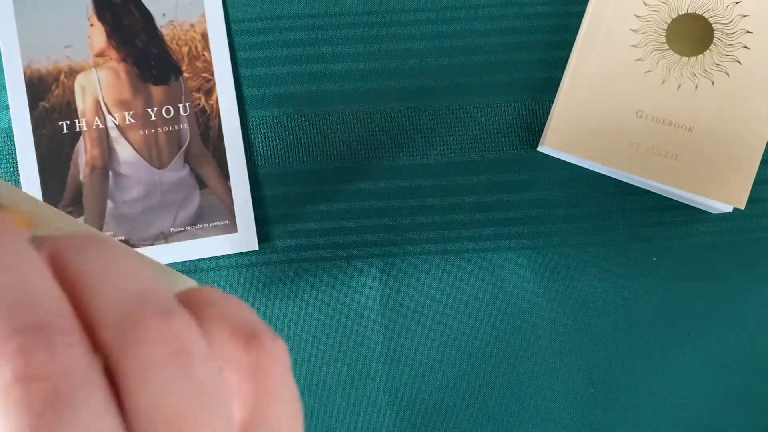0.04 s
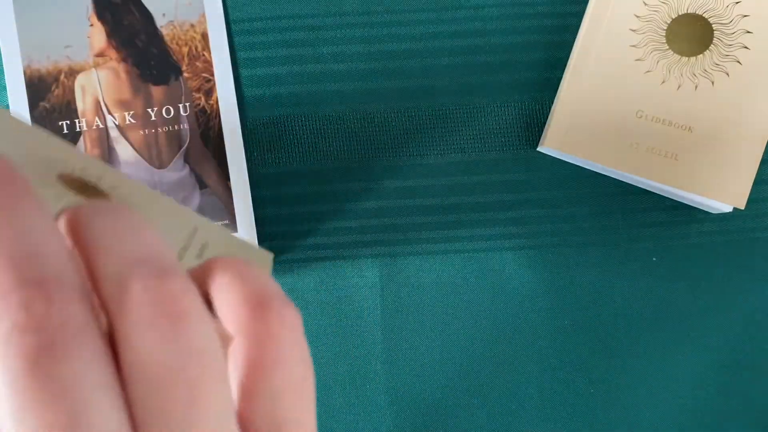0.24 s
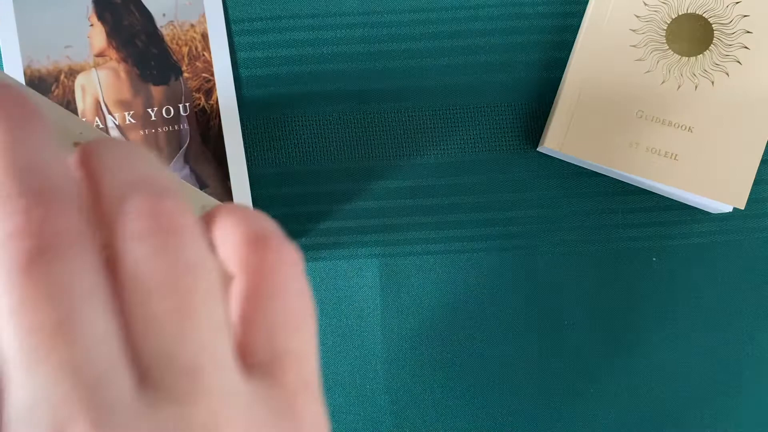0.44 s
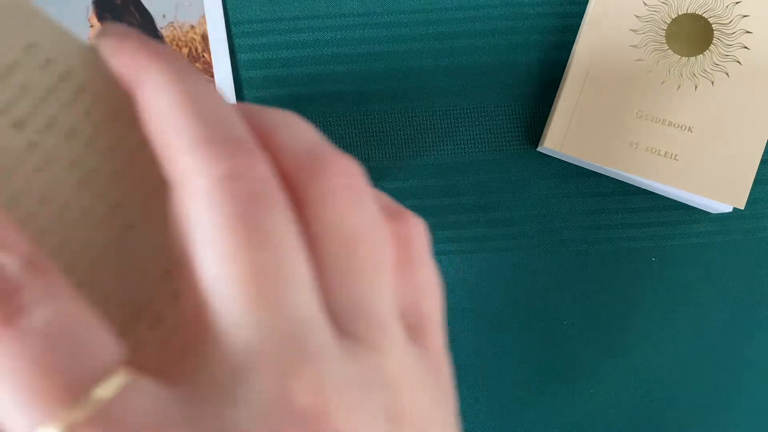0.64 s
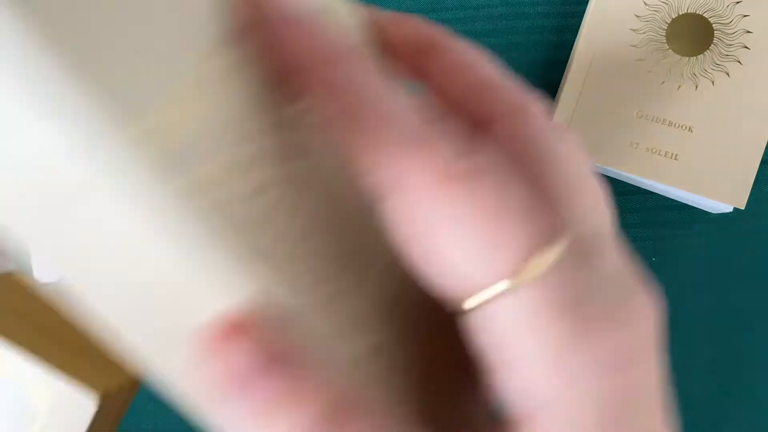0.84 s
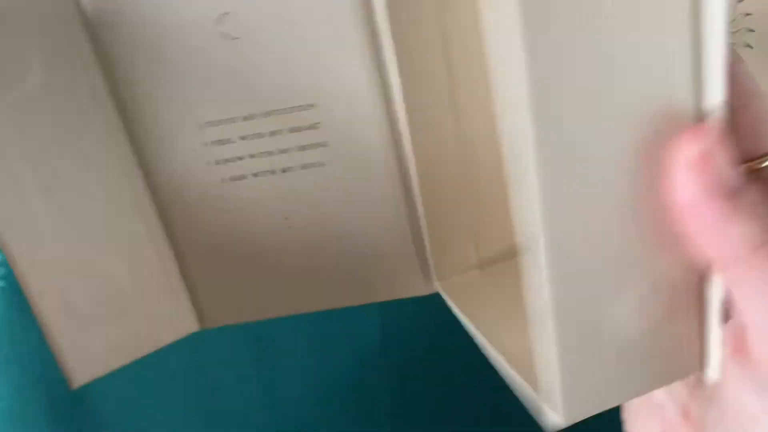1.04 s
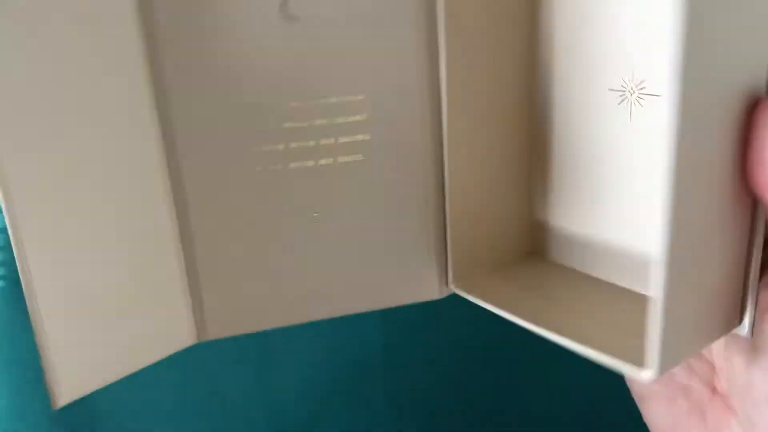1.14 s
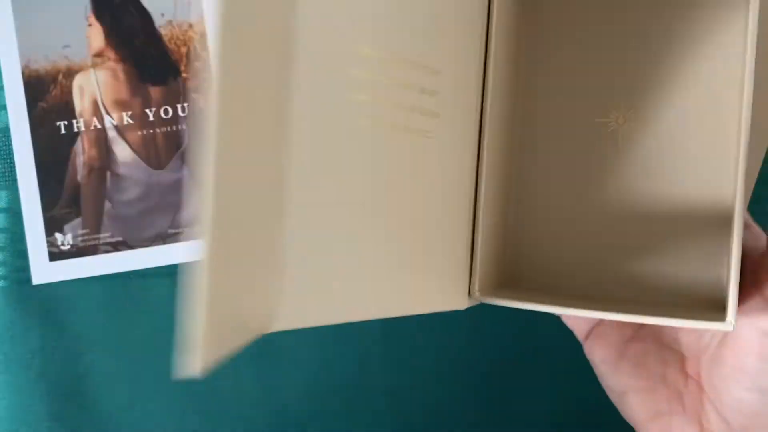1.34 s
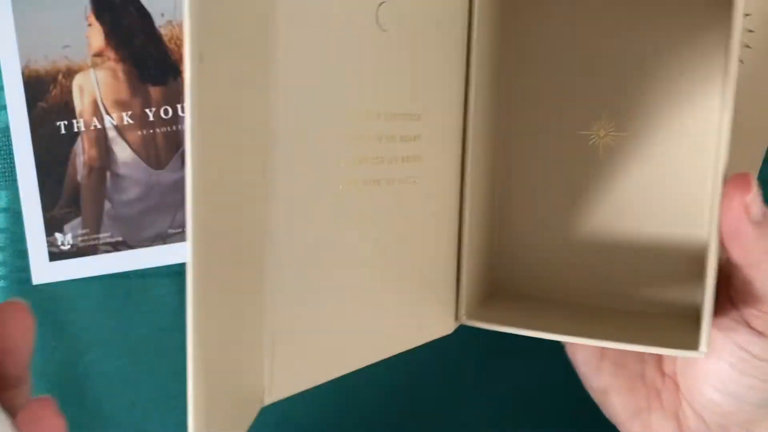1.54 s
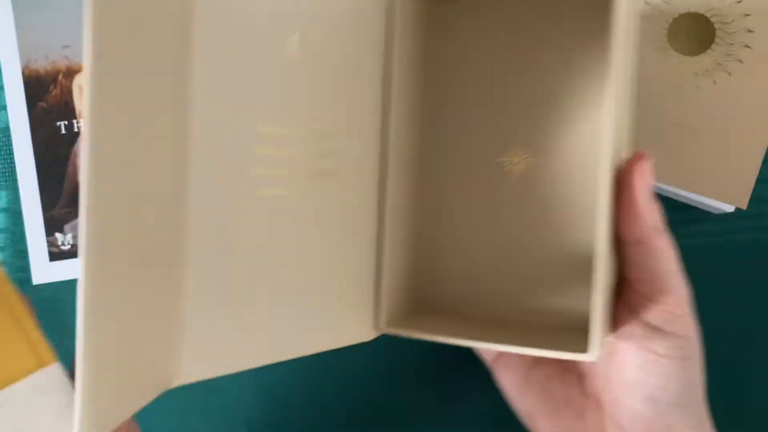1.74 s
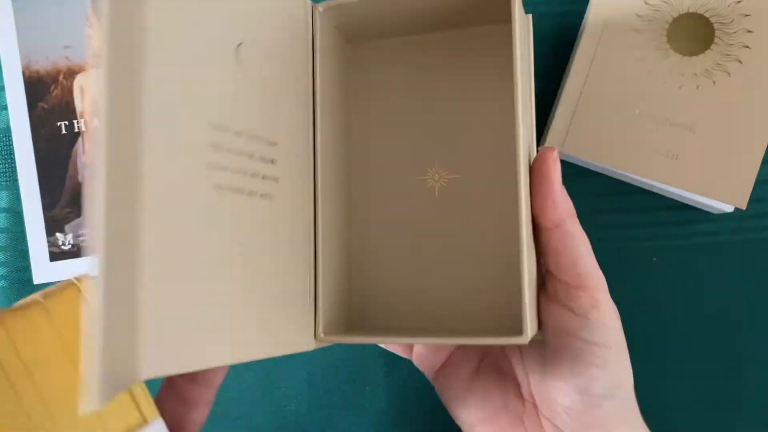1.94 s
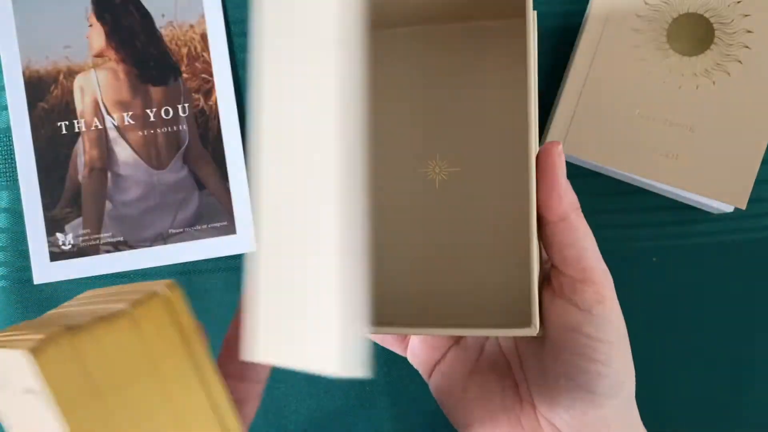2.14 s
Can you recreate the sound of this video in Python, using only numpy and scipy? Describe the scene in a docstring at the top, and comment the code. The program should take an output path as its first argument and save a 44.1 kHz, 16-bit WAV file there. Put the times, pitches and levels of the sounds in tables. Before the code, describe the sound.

A rigid cardboard box is handled and opened, with hollow knocks, a scrape and light snaps

```python
"""A small room: hands open a rigid cardboard box over a cloth-covered table, close to a phone.
The flap drags in noisy slips, knocks free, gives a gliding squeak and lands with a snap; grains of skin
friction hiss over the paper as the lid unfolds with two lighter snaps; then the loose lid knocks on the
empty box. Knocks and snaps are decaying modes whose bending waves bring the highs before the lows. A palm
rubs behind, with filtered-noise murmur, rumble and faint floor; decaying noise makes the reflections."""
import sys
import numpy as np
from scipy import signal
from scipy.fft import rfft, irfft, next_fast_len
from scipy.io import wavfile

SR = 44100
rng = np.random.default_rng(int(sys.argv[2]) if len(sys.argv) > 2 else 0)


def wrap_up_sound(samples):
    """Save the sound to the file named by the first command line argument, as 16-bit audio."""
    columns = np.atleast_2d(samples).T
    # keep every value between -1 and 1, then stretch to whole-number steps
    tamed = np.clip(columns, -1, 1)
    steps = np.round(tamed * 32767).astype(np.int16)
    wavfile.write(sys.argv[1], SR, steps)


N = 97020
T = np.arange(N) / SR  # seconds
SIZE = next_fast_len(2 * N)
HZ = np.maximum(np.arange(SIZE // 2 + 1) * SR / SIZE, 1)

# Modes of the closed box. Each row: frequency in Hz, level in dB, 60 dB decay time in seconds.
CLOSED_MODES = [(203, -12.5, 0.047), (357.2, -2.5, 0.073), (438, -6.5, 0.057), (539.2, -4, 0.093),
                (799, 2.5, 0.029), (1205, 1.5, 0.025), (1964, 0.5, 0.01), (2402, -3, 0.032),
                (3415, -9.5, 0.013)]
CLOSED_LAG_S, OPEN_LAG_S = 0.000928, 0.0016  # travel time of a 1 kHz bending wave


def amp(db):
    """Decibels to gain."""
    return 10 ** (np.asarray(db) / 20)


def unit(x):
    """Scale to rms 1."""
    return x / np.sqrt(np.mean(x ** 2))


def curve(rows):
    """Gain over time from (s, dB) points; silent before the first and after the last."""
    times, db = np.array(rows).T
    inside = (T >= times[0]) * (T <= times[-1])
    return amp(np.interp(T, times, db)) * inside


def colour(rows):
    """Frequency response from (Hz, dB) points, joined along log frequency."""
    hz, db = np.array(rows).T
    return amp(np.interp(np.log(HZ), np.log(hz), db))


def rings(rows):
    """Frequency response of (Hz, width Hz, dB) resonances, alternating in sign."""
    response = 0
    for k, (hz, width, db) in enumerate(rows):
        detuning = (HZ ** 2 - hz ** 2) / (HZ * width)
        response = response + (-1) ** k * amp(db) / (1 + 1j * detuning)
    return response


def shape(x, response):
    """Filter by a frequency response."""
    return irfft(rfft(x, SIZE) * response, SIZE)[..., :N]


def fade(t60):
    """Exponential decay, down 60 dB after t60 seconds."""
    return np.exp(-np.log(1000) * T / t60)


def swell(start, attack, hold, release):
    """Straight-line attack, hold and release, all in seconds."""
    rise = (T - start) / attack
    fall = 1 - (T - start - attack - hold) / release
    return np.clip(np.minimum(rise, fall), 0, 1)


def pan(x, db):
    """Place a sound between left and right; db is how much louder the left is."""
    return x * amp(np.array([[db], [-db]]) / 2)


def grains(rate, spread_db):
    """Tiny slips of random time, sign and size; rate is per second."""
    slipping = rng.random(N) < rate / SR
    sign = rng.choice([-1, 1], N)
    size = amp(spread_db * np.minimum(rng.exponential(size=N), 4))
    return unit(slipping * sign * size)


def ring(modes):
    """The cardboard's answer to a unit tap: a sum of decaying sines."""
    return sum(amp(db) * fade(t60) * np.sin(2 * np.pi * hz * T) for hz, db, t60 in modes)


def knocks(rows, modes, lag_s):
    """Each contact rings the modes and the board's dense grain; lows travel slower than highs."""
    board_t60_s, board_db, click_t60_s = 0.044, -10, 0.0029
    out = 0
    body = sum((-1) ** k * ring([mode]) for k, mode in enumerate(modes))
    bending = np.exp(-4j * np.pi * lag_s * np.sqrt(1000 * HZ))  # delay falls as 1 / sqrt(Hz)
    for start, db, contact_hz, bass_hz, click_db in rows:
        noise = rng.standard_normal((2, N))
        contact = 1 / (1 + 1j * HZ / contact_hz) / (1 + bass_hz / (1j * HZ))
        grain = amp(board_db) * noise[0] * fade(board_t60_s)
        board = rfft(body + grain, SIZE) * contact
        click = rfft(amp(click_db) * noise[1] * fade(click_t60_s), SIZE)
        delay = np.exp(-2j * np.pi * HZ * start)
        hit = irfft((board + click) * bending * delay, SIZE)[:N]
        out = out + amp(db) * hit
    return out


def flap_knocks():
    """The flap knocks on the closed box and rings its modes."""
    # Each row: start in seconds, level in dB, contact cut-off in Hz, bass cut in Hz, click in dB.
    contacts = [(.1305, -53, 2000, 60, -8.5), (.191, -41.5, 1800, 150, -21), (.2286, -23.5, 1800, 400, -26),
                (.2334, -21.5, 1150, 250, -21.5), (.2535, -35.5, 900, 250, -21.5),
                (.3114, -30.5, 4500, 496, -22.5)]
    return knocks(contacts, CLOSED_MODES, CLOSED_LAG_S)


def landing_and_lid_snaps():
    """A dense snap as the flap lands, then two lighter snaps as the lid unfolds; all share one set of modes."""
    # Each row: start in seconds, level in dB, contact cut-off in Hz, bass cut in Hz, click in dB.
    snaps = [(.4797, -45, 3480, 40.2, -1.5), (.926, -64, 3500, 604, -2), (1.218, -47, 560, 60.3, -21)]
    # Modes of all three snaps. Each row: frequency in Hz, level in dB, 60 dB decay time in seconds.
    snap_modes = [(102.3, 2, 0.057), (335, 6, .045), (1450, 5, 0.015), (2327, 6.5, 0.023), (3520, -4, .009)]
    return knocks(snaps, snap_modes, OPEN_LAG_S)


def lid_knocks():
    """The loose lid knocks on the empty box and rings its open modes."""
    # Each row: start in seconds, level in dB, contact cut-off in Hz, bass cut in Hz, click in dB.
    contacts = [(1.8101, -31, 3420, 49.1, -10), (1.8766, -22.5, 4250, 73.8, -17.5),
                (1.8942, -30.5, 850, 49.8, -10)]
    # The open box. Each row: frequency in Hz, level in dB, 60 dB decay time in seconds.
    open_modes = [(57.7, -12, 0.2), (153.2, 0.5, 0.03), (226, 3, 0.05), (282, -3, 0.051), (443, 2, 0.029),
                  (705, -5.5, 0.074), (1193, -3.5, 0.031), (1870, -3, 0.025), (2230, -8.5, 0.0094),
                  (2930, -10, 0.0097), (4700, -6.5, 0.0056), (6220, -6.5, 0.015)]
    return knocks(contacts, open_modes, OPEN_LAG_S)


def squeak():
    """The flap's edge sticks and slips unevenly for a few cycles, rising slightly."""
    start_s, start_hz, glide_hz_per_s = .3145, 838, 1200
    level_db, pan_db = -28, 7.5
    hz = start_hz + glide_hz_per_s * np.clip(T - start_s, 0, .05)
    jitter = unit(shape(rng.standard_normal(N), 1 / (1 + (HZ / 300) ** 2)))
    phase = 2 * np.pi * np.cumsum(hz) / SR + .34 * jitter  # radians
    tone = np.sin(phase) + amp(-18.0) * np.sin(3 * phase)
    envelope = swell(start_s, attack=0.004, hold=0.0045, release=0.012)
    return pan(amp(level_db) * tone * envelope, pan_db)


def drag():
    """Card scraping on card: slips ring the closed box and add grit."""
    # The edge dragging on the box. Each row: time in seconds, level in dB.
    drag_level = [(.14, -70.5), (.222, -44), (.26, -40), (.285, -49), (.335, -46), (.365, -62.5),
                  (.386, -53), (.415, -70), (.435, -56.5), (.485, -46), (.51, -62.5), (.59, -88)]
    # Tone of the grit. Each row: frequency in Hz, level in dB.
    grit_colour = [(150, -7.5), (400, -1.5), (2500, -12.5), (4000, -17), (15000, -33)]
    ring_db, grit_db = -8.5, -2.5
    slips = grains(800, spread_db=4.5)
    body = unit(shape(slips, rfft(ring(CLOSED_MODES), SIZE)))
    grit = unit(shape(slips, colour(grit_colour)))
    return curve(drag_level) * (amp(ring_db) * body + amp(grit_db) * grit)


def fingers():
    """Skin hisses over paper in separate strokes, each with its own brightness and panel resonance."""
    # Each row: start in seconds, attack in seconds, hold plus release in seconds, level in dB,
    # tilt in dB per octave, panel resonance in Hz, its level in dB.
    strokes = [(-.01, 0.083, 0.065, -63, -2, 4970, -15), (0.178, 0.057, 0.036, -46.5, 1, 5200, -4),
               (.265, 0.014, 0.13, -63, -4, 4300, -9), (0.719, 0.12, 0.18, -69.5, -0.5, 5420, -12),
               (.918, 0.007, 0.15, -70.5, -4.5, 674, -2), (0.977, 0.085, 0.093, -60, -2.1, 5070, 7),
               (1.14, 0.011, 0.065, -63, -3.5, 4830, -7), (1.221, 0.01, 0.145, -61, -2.5, 2610, 1),
               (1.381, 0.086, 0.034, -65, -1.6, 2610, 9), (1.637, 0.0039, 0.23, -55.5, 1.3, 2600, 9),
               (1.921, 0.06, 0.165, -66.5, -.3, 1150, 2)]
    # Skin on paper before the tilt. Each row: frequency in Hz, level in dB.
    skin_colour = [(350, -27.5), (700, -10.5), (1400, -10.5), (4400, 1), (16000, 1)]
    panel_width_hz, flutter_db = 240, 1.3
    slips, out = grains(9000, spread_db=2.5), 0
    wander = unit(shape(rng.standard_normal(N), 1 / (1 + (HZ / 60) ** 2)))
    flutter = amp(flutter_db * wander)
    for start, attack, length, db, tilt, hz, ring_db in strokes:
        panel = 0.5 + rings([(hz, panel_width_hz, ring_db)])
        response = colour(skin_colour) * amp(tilt * np.log2(HZ)) * panel
        envelope = swell(start, attack, length / 2, length / 2)
        out = out + amp(db) * envelope * unit(shape(slips, response))
    return flutter * out


def palm():
    """The supporting hand rubs the open box, and the walls colour its slips."""
    # The rubbing. Each row: time in seconds, level in dB.
    rub_level = [(1.238, -62.5), (1.36, -79), (1.47, -73), (1.6, -79), (1.67, -66.5), (2.03, -65.5),
                 (2.14, -74)]
    # The walls' resonances. Each row: frequency in Hz, width in Hz, level in dB.
    wall_rings = [(660, 310, 3), (1325, 470, 2.9), (2150, 640, 1.15)]
    return curve(rub_level) * unit(shape(grains(4000, spread_db=4.0), rings(wall_rings)))


def hollow():
    """Low murmur of the open box: noise through the resonances of its hollow."""
    # The murmur. Each row: time in seconds, level in dB.
    murmur_level = [(1.2, -72.5), (1.37, -64), (2.25, -64.5)]
    # The hollow's resonances. Each row: frequency in Hz, width in Hz, level in dB.
    hollow_rings = [(234, 372, -5), (371.5, 45, 7)]
    response = rings(hollow_rings) / (1 + (HZ / 1500) ** 2)
    return curve(murmur_level) * unit(shape(rng.standard_normal(N), response))


def reflections(x, t60, build_s):
    """Diffuse echoes, unrelated left and right and thin in the bass."""
    tail = rng.standard_normal((2, N)) * fade(t60) * np.clip(T / build_s, 0, 1)
    bass_cut = 1 / (1 + 250 / (1j * HZ))
    return shape(x.mean(0), rfft(unit(tail) / np.sqrt(N), SIZE) * bass_cut)


def rumble():
    """Handling rumble: low noise that swells and sinks, the same on both sides."""
    # Each row: time in seconds, level in dB.
    rumble_level = [(-.05, -63), (.45, -60), (.62, -69), (1.04, -61.5), (1.245, -54.5), (1.33, -60.5),
                    (2.25, -61.5)]
    # Its tone. Each row: frequency in Hz, level in dB.
    rumble_colour = [(26, -33), (50, 4), (75, -1.5), (170, -21)]
    response = colour(rumble_colour) / (1 + (HZ / 180) ** 4)
    return curve(rumble_level) * unit(shape(rng.standard_normal(N), response))


def noise_floor():
    """Faint steady noise, weaker towards the treble and unrelated left and right."""
    # Each row: frequency in Hz, level in dB.
    floor_colour = [(220, -7), (700, -12.5), (4000, -31.5)]
    return amp(-76.5) * unit(shape(rng.standard_normal((2, N)), colour(floor_colour)))


def scene():
    """The box and hands, their reflections, handling rumble and a faint floor."""
    hits = flap_knocks() + landing_and_lid_snaps() + lid_knocks()
    near = pan(hits, -1.9) + squeak() + drag() + fingers() + palm() + hollow()
    # close reflections from table, lid and hands, then the small room
    table = amp(-10) * reflections(near, t60=0.016, build_s=0.004)
    room = amp(-12.5) * reflections(near, t60=0.19, build_s=0.0013)
    return near + table + room + rumble() + noise_floor()


def record(dry):
    """Left and right differ in phase, by a stepped amount that grows through the treble; the top is cut."""
    # Phase between left and right. Each row: frequency in Hz, lead of the left in radians.
    stereo_phase = [(0, 0), (5300, .4), (6900, 3.0), (8100, 3.3), (9700, 6.1), (11200, 6.5), (12700, 9.2),
                    (14400, 9.6), (16000, 12.5)]
    top_hz = 15900
    lead = np.interp(HZ, *np.array(stereo_phase).T)
    shifted = shape(dry, np.exp(1j * lead * np.array([[.5], [-.5]])))
    top_cut = signal.ellip(10, .2, 70, top_hz, fs=SR, output="sos")
    return signal.sosfilt(top_cut, shifted)


dry = scene()
out = record(dry)
wrap_up_sound(out)
```